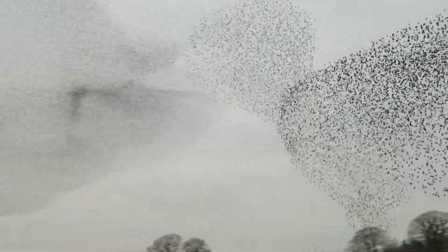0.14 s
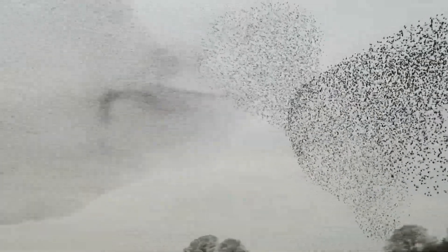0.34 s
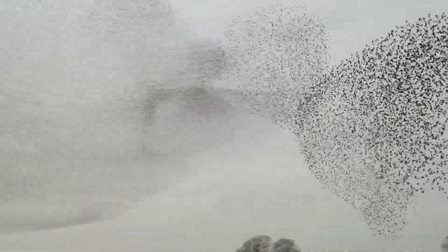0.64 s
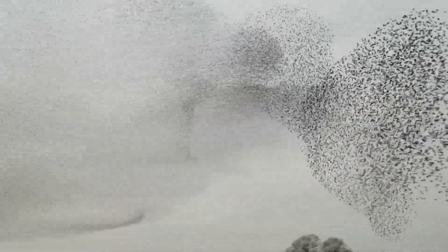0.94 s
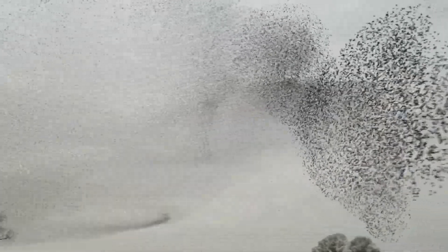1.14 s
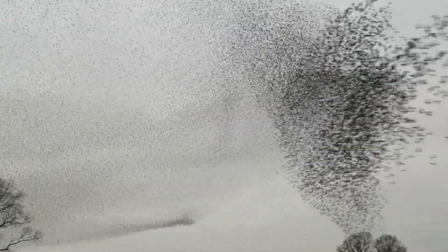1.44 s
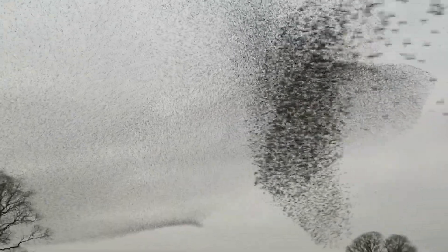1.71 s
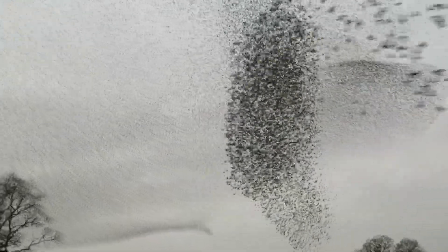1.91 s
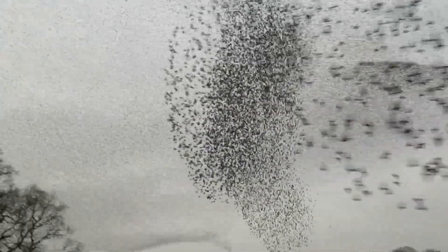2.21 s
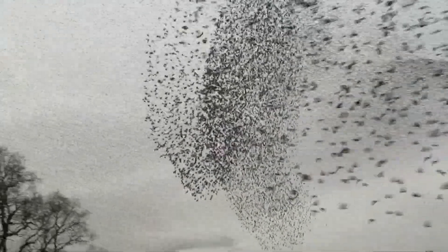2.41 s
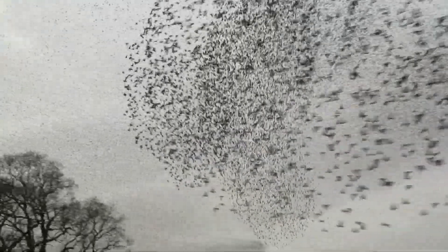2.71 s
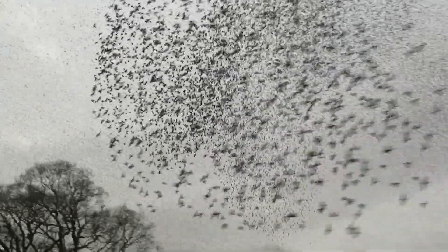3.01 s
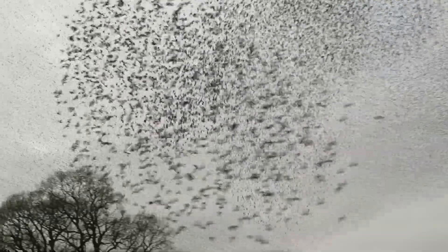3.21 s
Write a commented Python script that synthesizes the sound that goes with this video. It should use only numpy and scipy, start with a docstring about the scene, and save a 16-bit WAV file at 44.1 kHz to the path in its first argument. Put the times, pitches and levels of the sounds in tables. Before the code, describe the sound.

A vast flock of birds whirrs past close outdoors, wings hissing and fluttering, with light wind.

```python
"""A huge flock of starlings sweeps overhead from the right, over the low rumble of a light wind.
From the start, thousands of downstrokes merge into a low flutter, a rush of air and a whirr, all shaped noise.
A faint tone glides at 0.9 s. Just after 2 s the flock is nearest and feathers hiss most.
The nearest birds then cross to the front, heard by the delay between two close microphone ports.
The hiss sinks again, and a faint hoot, also a gliding tone, comes at 3.1 s."""
import sys
import numpy as np
from scipy import signal
from scipy.fft import rfft, irfft, next_fast_len
from scipy.io import wavfile
from scipy.ndimage import uniform_filter1d, map_coordinates

SR = 44100
rng = np.random.default_rng(int(sys.argv[2]) if len(sys.argv) > 2 else 0)


def file_out(sig):
    """Save sig as 16-bit WAV at sys.argv[1]."""
    # one column per channel
    cols = np.atleast_2d(sig).T
    # limit, then scale
    lim = np.clip(cols, -1, 1)
    pcm = np.round(lim * 32767).astype(np.int16)
    wavfile.write(sys.argv[1], SR, pcm)


N = 147735

# Nearness of the flock, as the loudness of the feather hiss: t/s, level/dB
NEARNESS = [(0, -54.5), (.4, -50.5), (1.0, -48.7), (1.5, -46), (1.7, -45), (2.0, -43), (2.3, -40),
            (2.48, -43.5), (2.9, -45.5), (3.35, -48)]
# Direction of the nearest birds: t/s, sine of the angle (right is positive)
BEARING_PATH = [(0, 0.7), (1.7, 0.67), (2.35, 0.61), (2.7, 0.44), (3.05, .26), (3.35, 0.035)]
# Width of the flock as it comes overhead: t/s, spread of the sine of the angle
FLOCK_WIDTH = [(0, 0.02), (1.7, 0.017), (2.3, 0.077), (2.7, 0.18), (3.35, 0.3)]
# Tone of the flutter once its pitch has sunk (pitch factor 1): f/Hz, relative level/dB per Hz
FLUTTER_SPECTRUM = [(30, -9), (70, -7.5), (115, -2.5), (152, -1), (200, -6), (270, -14), (450, -34),
                    (1000, -93)]
# How the flutter deepens as the flock passes: t/s, pitch factor
FLUTTER_PITCH = [(0, 1.18), (1.2, 1.15), (1.8, 1.02), (2.3, 1.02), (2.7, .97), (3.35, 1.0)]
# Tone of the rush: f/Hz, relative level/dB per Hz
RUSH_SPECTRUM = [(100, -15.5), (250, 1), (350, 0), (430, -1), (540, 0), (740, -4.5), (950, -2.5),
                 (1400, -8), (1900, -9), (2700, -13), (3500, -17.5), (4800, -20), (7000, -29.5),
                 (10000, -34.5), (15000, -71)]
# Side part of the rush, on top of the tone above: f/Hz, relative level/dB
RUSH_SIDE_SPECTRUM = [(100, -28), (220, -16.5), (380, -13.5), (560, -17), (780, -15.5), (1150, -15),
                      (1700, -11.5), (2300, -11), (2800, -5), (3800, -7), (7000, -0.5), (10000, 5),
                      (15000, 6)]
# The rush narrows as the flock comes in front: t/s, level of its side part/dB
RUSH_SPREAD = [(0, -0.3), (1.1, -0.5), (1.8, -3), (2.3, -3), (2.7, -5), (3.35, -3)]
# Boost of the right ear for a rush fully from the right: f/Hz, level/dB
RUSH_RIGHT_BOOST = [(200, 0), (700, 0.9), (1300, 0), (2400, 2), (5000, 1.5), (12000, 4.5)]
# Small changes in the level of the rush, with a brief dip at 2.7 s: t/s, level/dB
RUSH_LEVEL = [(0, -0.5), (2.4, 0), (2.7, -0.75), (3.35, 0.2)]
# Tone of the feather hiss: f/Hz, relative level/dB per Hz
HISS_SPECTRUM = [(300, -13), (1000, 8), (2200, 3), (3400, 1), (4800, 1.8), (7000, -3), (9500, -4),
                 (12800, -1), (14200, -11.5), (15600, -21)]
# Whirr of the wings, sinking as the birds pass: t/s, centre f/Hz, level/dB
WHIRR_PATH = [(0, 1154, -47), (.6, 1163, -46.5), (1.08, 1150, -44.5), (1.35, 1139, -50.5),
              (1.6, 1150, -45.5), (1.9, 1126, -46), (2.251, 1115, -44), (2.7, 1059, -48.5),
              (3.35, 1038, -47)]
# Near birds beating together: middle t/s, length t/s, centre f/Hz, level at the crest/dB
SURGE_EVENTS = [(0.836, 0.057, 179.8, -33.5), (1.222, 0.16, 198.8, -35), (1.806, 0.086, 154.8, -32),
                (1.905, 0.052, 165, -35), (2.133, 0.12, 164.5, -33.5), (2.307, 0.25, 175.5, -33.5),
                (2.5, .08, 163.8, -38), (2.606, 0.062, 146.4, -32), (2.675, 0.093, 168, -32.5),
                (2.769, 0.066, 155, -39), (2.93, 0.13, 155, -34.5), (3.194, 0.11, 144.2, -35)]
# Small groups passing close: middle t/s, length t/s, centre f/Hz, width f/Hz, level at the crest/dB
WHOOSH_EVENTS = [(.6, .11, 2500, 1500, -48), (0.806, .09, 2300, 1500, -50), (0.98, .14, 2800, 1200, -47.5),
                 (1.108, 0.063, 1168, 170, -38), (1.234, 0.082, 2835, 700, -48),
                 (1.506, 0.056, 1142, 170, -41.5), (1.587, .08, 1157, 170, -40),
                 (1.635, 0.098, 2500, 1500, -45), (2.04, 0.074, 2020, 1500, -46),
                 (2.044, 0.049, 1058, 170, -37), (2.208, .13, 950, 700, -38), (2.334, .2, 2790, 3000, -51),
                 (2.366, 0.17, 560, 400, -41.5)]
# Tone of the wind: f/Hz, relative level/dB per Hz
WIND_SPECTRUM = [(5, -25), (18, -20), (30, -3.5), (55, 1.5), (78, 1.5), (105, -7), (200, -21), (600, -99)]
# Strength of the wind: t/s, level/dB
WIND_GUSTS = [(0, -36.5), (.5, -37), (.8, -42.5), (1.0, -40.5), (1.25, -44.5), (1.52, -37.5), (1.8, -43),
              (2.2, -40.5), (2.6, -43.5), (2.9, -45.5), (3.35, -49)]
# Faint gliding tones, the later one like a far hoot:
# middle t/s, length t/s, top of the pitch arch f/Hz, level at the crest/dB
GLIDE_EVENTS = [(0.921, 0.13, 405, -40.5), (3.137, 0.17, 540, -38.5)]

BEAT_HZ, BEAT_SCATTER = 11, 0.133  # typical wingbeat; spread between groups, as a fraction
STROKES_PER_S, STROKE_SCATTER_DB = 1100, 4
# Level at mean nearness, and the share of the nearness that each layer follows
FLUTTER_DB, FLUTTER_FOLLOW = -37, 0.24
RUSH_DB, RUSH_FOLLOW = -37, 0.13
RUSH_FLICKER_DB, WHIRR_FLICKER_DB = .6, 1.6
PORT_LAG_S = 5.2e-5  # delay between the ports for sound fully from the right
STROKE_DB, PASSING_DB = 2.3, 1.2  # swing of the hiss with each stroke; slower random swing
HISS_PAN_DB, WHIRR_PAN_DB = 0.3, 0.4  # right over left; the hiss takes this times its bearing
WHIRR_WIDTH_HZ, SURGE_WIDTH_HZ = 174, 98
SWISHES_PER_S, SWISH_S, SWISH_DB, SWISH_SCATTER_DB = 80, .04, -48.5, 1.5  # level is for the lowest pitch
SWISH_LOW_HZ, SWISH_HIGH_HZ, SWISH_WIDTH_HZ = 1400, 3200, 450
SWISH_TILT_DB, SWISH_PAN_DB = -4, 2.5  # per octave above the lowest; sets the left-right spread
# Pitch tops out just before the middle; half-width and depth of its arch; unsteadiness (fractions of pitch)
GLIDE_CREST_S, GLIDE_ARCH_S, GLIDE_SAG, GLIDE_WAVER = 0.0148, 0.0514, 0.15, 0.0158
TOP_HZ = 15500


def flutter(near_db):
    """Each downstroke pushes out a soft thump of air; many overlap, and their pitch sinks as the birds pass."""
    starts = rng.random(N) < STROKES_PER_S / SR
    scatter_db = STROKE_SCATTER_DB * np.clip(rng.standard_normal(N), -2, 2)
    sizes = undb(scatter_db) * rng.choice([-1, 1], N)
    clock = np.cumsum(curve(FLUTTER_PITCH))
    pace = clock[-1] / (N - 1)
    # Make the thumps at the average pitch, then play them faster or slower
    spectrum = [(hz * pace, db) for hz, db in FLUTTER_SPECTRUM]
    thumps = colour(starts * sizes, spectrum)
    heard = map_coordinates(thumps, [clock / pace], order=3, mode="mirror")
    return unit(heard) * undb(FLUTTER_DB + FLUTTER_FOLLOW * near_db)


def rush(near_db):
    """Countless wings blur into a rush of noise; each band below 6 kHz flickers by chance, twice per beat."""
    rest = rng.standard_normal((2, N))
    air = 0
    for edge in 375 * 2 ** np.arange(5):  # band tops in Hz, an octave apart
        band = colour(rest, [(edge * .9, 0), (edge * 1.1, -60)])
        rest = rest - band
        air = air + band * undb(RUSH_FLICKER_DB * walk(2 * BEAT_HZ))
    middle, side = colour(air + rest, RUSH_SPECTRUM)
    side = colour(side, RUSH_SIDE_SPECTRUM) * undb(curve(RUSH_SPREAD))
    left = middle + side
    right = middle - side
    boost = colour(right, RUSH_RIGHT_BOOST) - right
    right = right + boost * curve(BEARING_PATH)
    level_db = RUSH_DB + RUSH_FOLLOW * near_db + curve(RUSH_LEVEL)
    return unit(np.array([left, right])) * undb(level_db)


def feathers(count):
    """Near groups swish once a stroke; sound from the right reaches the right port first."""
    out = np.zeros((2, N))
    samples = np.arange(N)
    bearing, width = curve(BEARING_PATH), curve(FLOCK_WIDTH)
    places = unit(np.linspace(-1, 1, count))
    for place, (start, pace) in zip(places, rng.uniform(-1.094, 1, (count, 2))):
        beats = start + BEAT_HZ * (1 + BEAT_SCATTER * pace) * samples / SR
        swing_db = STROKE_DB * np.cos(2 * np.pi * beats) + PASSING_DB * walk(3.98)
        swish = rng.standard_normal(N) * undb(swing_db)
        lag = PORT_LAG_S * SR * (bearing + width * place)  # in samples
        out[0] += map_coordinates(swish, [samples - lag], order=5, mode="mirror")
        out[1] += swish
    hiss = unit(colour(out, HISS_SPECTRUM))
    return hiss * undb(curve(NEARNESS)) * rightward(HISS_PAN_DB * bearing)


def whirr():
    """A narrow band of noise from the wings sinks in pitch and flickers by chance, three times per beat."""
    rows = np.array(WHIRR_PATH)
    centre_hz = curve(rows[:, :2])
    level_db = curve(rows[:, [0, 2]]) + WHIRR_FLICKER_DB * walk(3 * BEAT_HZ)
    return breathy(centre_hz, WHIRR_WIDTH_HZ) * undb(level_db) * rightward(WHIRR_PAN_DB)


def surges():
    """Near birds fall into step for a moment and the flutter throbs: short swells of low noise."""
    return sum(undb(db) * swell(at, length) * breathy(hz, SURGE_WIDTH_HZ)
               for at, length, hz, db in SURGE_EVENTS)


def whooshes():
    """Small groups cut through the air close by, some with a broad swish, some with a narrow whirr."""
    air = sum(undb(db) * swell(at, length) * breathy(hz, width)
              for at, length, hz, width, db in WHOOSH_EVENTS)
    return air * rightward(1.1)


def swishes():
    """Single wings stand out of the rush for a stroke: short noise puffs, each with its own pitch and place."""
    out = np.zeros((2, N))
    size, count = int(SWISH_S * SR), int(SWISHES_PER_S * N / SR)
    low = signal.butter(2, SWISH_WIDTH_HZ / 2, fs=SR, output="sos")
    air = signal.sosfilt(low, rng.standard_normal((2, N)))
    air = unit(air[0]) + 1j * unit(air[1])
    for k, (when, high, strong, side) in enumerate(rng.random((count, 4))):
        start = int((k + when) / count * (N - size))
        octaves = high * np.log2(SWISH_HIGH_HZ / SWISH_LOW_HZ)
        hz = SWISH_LOW_HZ * 2 ** octaves
        turn = np.exp(2j * np.pi * hz * np.arange(size) / SR)  # lifts the slow noise up to hz
        db = SWISH_DB + SWISH_TILT_DB * octaves + SWISH_SCATTER_DB * (2 * strong - 1)
        stroke = (air[start:start + size] * turn).real * np.hanning(size) * undb(db)
        pan_db = SWISH_PAN_DB * (2 * side - .5)  # leans right on average
        out[:, start:start + size] += stroke * rightward(pan_db)
    return out


def wind():
    """Moving air rumbles: low noise that follows the gusts, the same on both sides."""
    return unit(colour(rng.standard_normal(N), WIND_SPECTRUM)) * undb(curve(WIND_GUSTS))


def gliding_tones():
    """Soft pure tones swell and fade on a wavering arch of pitch."""
    t = np.arange(N) / SR
    out = 0
    for at, length, hz, db in GLIDE_EVENTS:
        arch = np.exp(-((t - at + GLIDE_CREST_S) / GLIDE_ARCH_S) ** 2)
        pitch = hz * (1 - GLIDE_SAG * (1 - arch) + GLIDE_WAVER * walk(90))
        tone = unit(np.sin(2 * np.pi * np.cumsum(pitch) / SR))
        out = out + undb(db) * swell(at, length) * tone
    return out


def breathy(centre_hz, width_hz):
    """A band of turbulence, rms 1, whose centre may move: slow noise carried up by a tone."""
    low = signal.butter(2, width_hz / 2, fs=SR, output="sos")
    a, b = signal.sosfilt(low, rng.standard_normal((2, N)))
    phase = 2 * np.pi * np.cumsum(centre_hz * np.ones(N)) / SR
    return unit(a * np.cos(phase) + b * np.sin(phase))


def swell(middle, length):
    """A smooth rise and fall, times in seconds."""
    t = np.arange(N) / SR
    return np.cos(np.pi * np.clip((t - middle) / length, -.5, .5)) ** 2


def walk(rate):
    """Smooth chance of spread 1 that changes about rate times a second."""
    k = max(int(SR / rate), 1)
    steps = np.repeat(rng.standard_normal(N // k + 2), k)
    smooth = uniform_filter1d(uniform_filter1d(steps, k), k)
    return unit(smooth[:N])


def colour(x, points):
    """Filter by a spectrum of (Hz, dB) points."""
    size = next_fast_len(N, real=True)
    hz, db = np.array(points, float).T
    bins = np.maximum(np.fft.rfftfreq(size, 1 / SR), 1)
    gain = undb(np.interp(np.log(bins), np.log(hz), db))
    return irfft(rfft(x, size) * gain, size)[..., :N]


def curve(rows):
    """A control curve from (seconds, value) rows, one value per sample."""
    return np.interp(np.arange(N) / SR, *np.array(rows, float).T)


def rightward(db):
    """Left and right gains that favour the right by db."""
    return undb(np.array([[-1], [1]]) * db / 2)


def unit(x):
    """Scale to rms 1."""
    return x / np.sqrt(np.mean(x ** 2))


def undb(db):
    """Decibels to gain."""
    return 10 ** (np.asarray(db) / 20)


def scene():
    """The flutter and rush swell with the flock's nearness; the other layers join them, over the wind."""
    near_db = curve(NEARNESS) - curve(NEARNESS).mean()
    flock = flutter(near_db) + rush(near_db) + feathers(count=10)
    flock = flock + whirr() + surges() + whooshes() + swishes()
    return flock + wind() + gliding_tones()


def record(dry):
    """A steep low-pass filter cuts the top of the treble."""
    return signal.sosfilt(signal.ellip(10, .1, 80, TOP_HZ, fs=SR, output="sos"), dry)


dry = scene()
out = record(dry)
file_out(out)
```